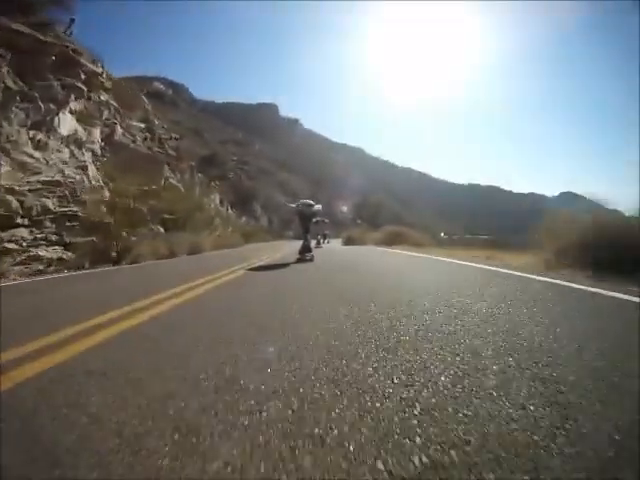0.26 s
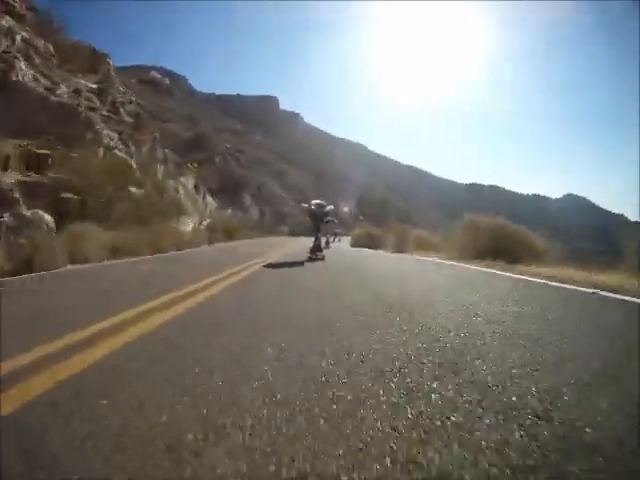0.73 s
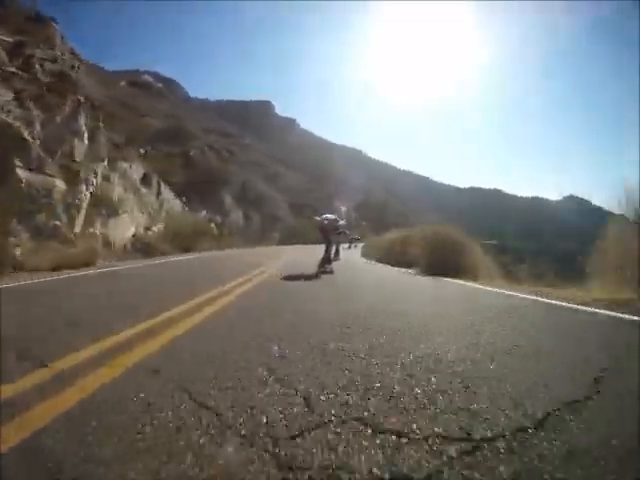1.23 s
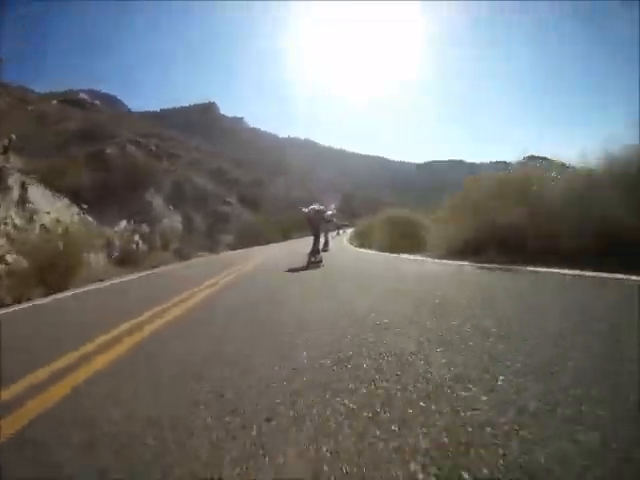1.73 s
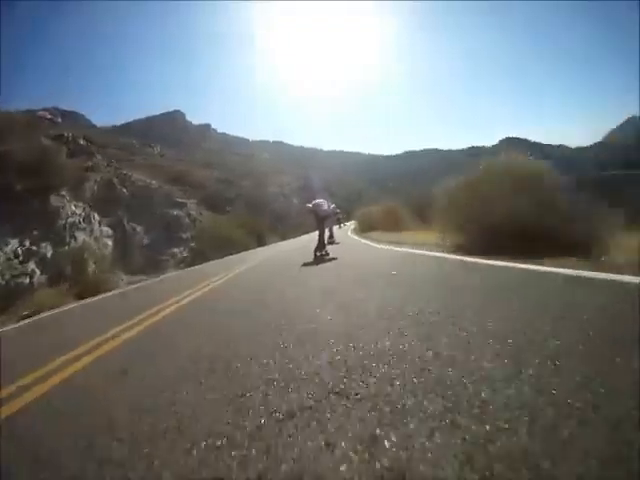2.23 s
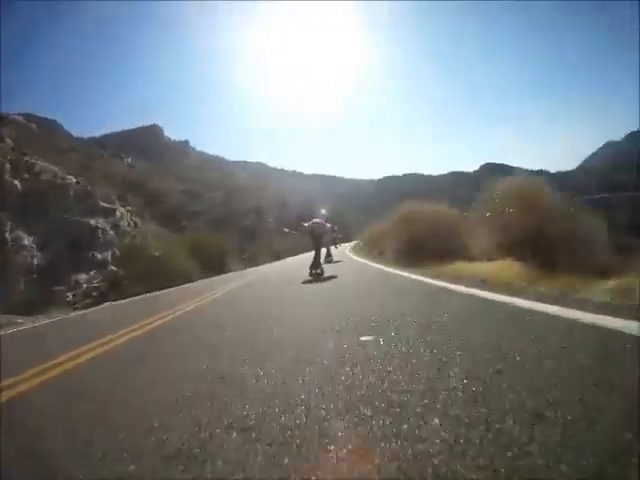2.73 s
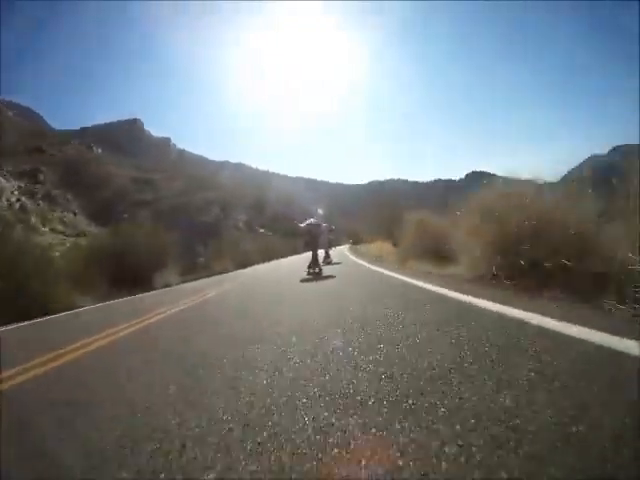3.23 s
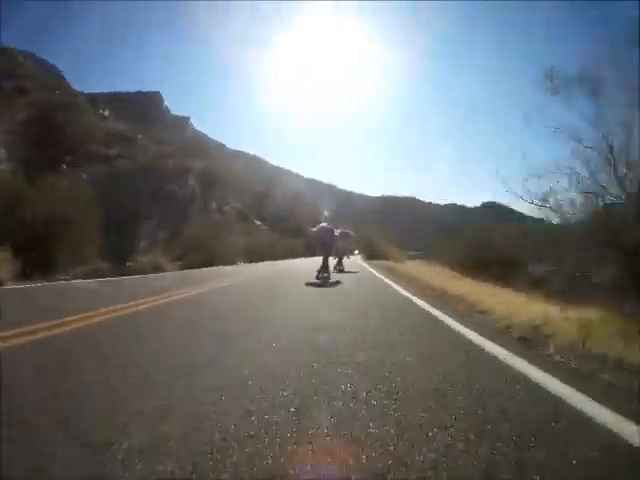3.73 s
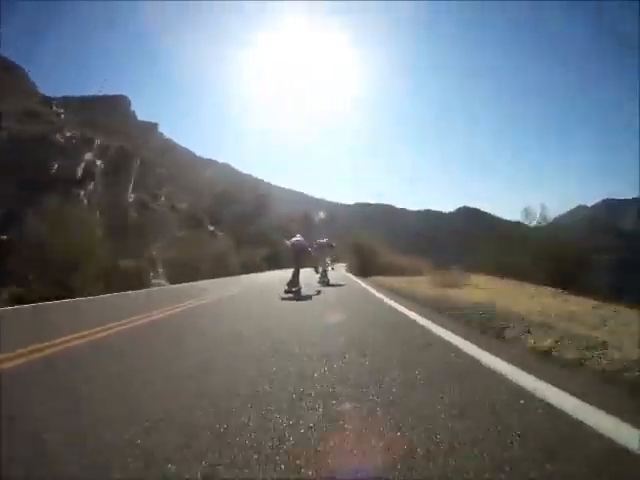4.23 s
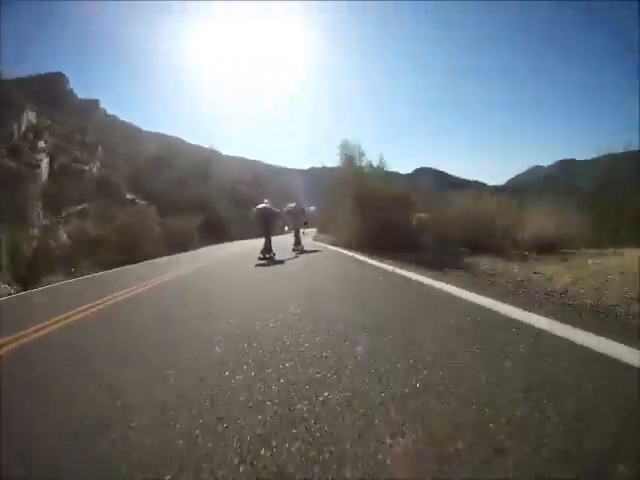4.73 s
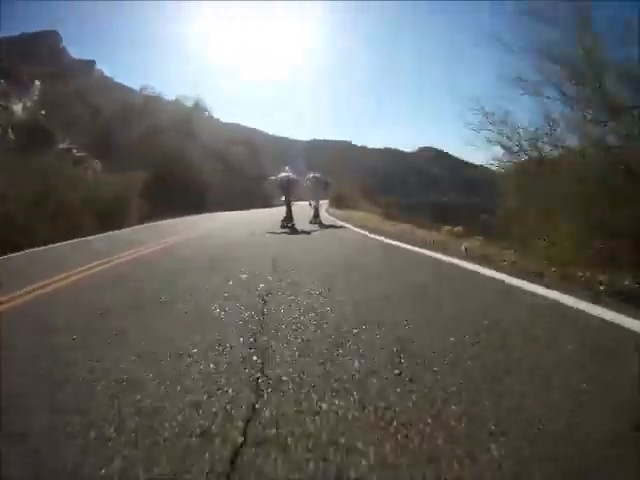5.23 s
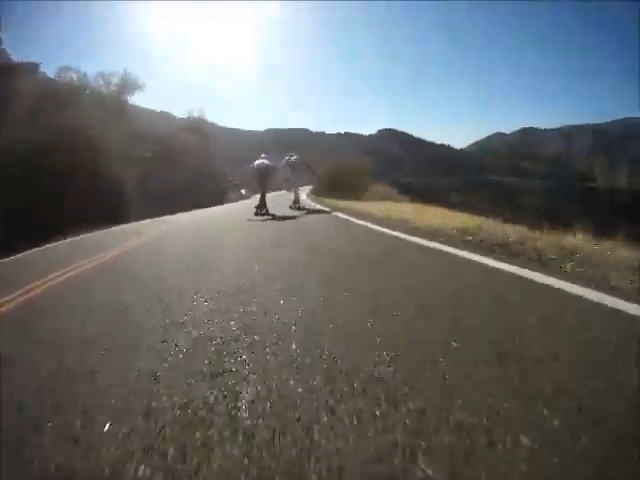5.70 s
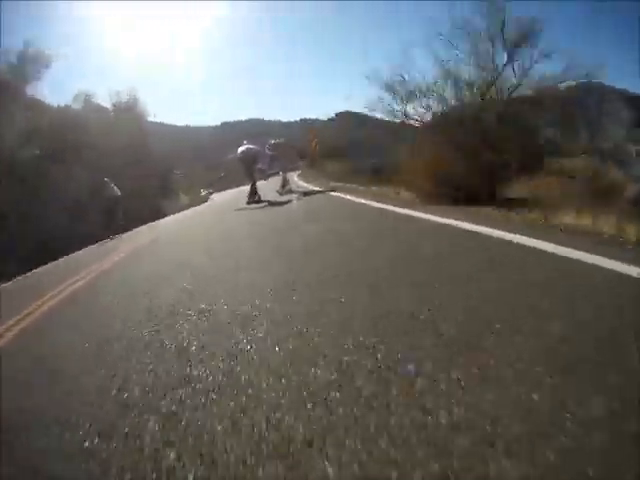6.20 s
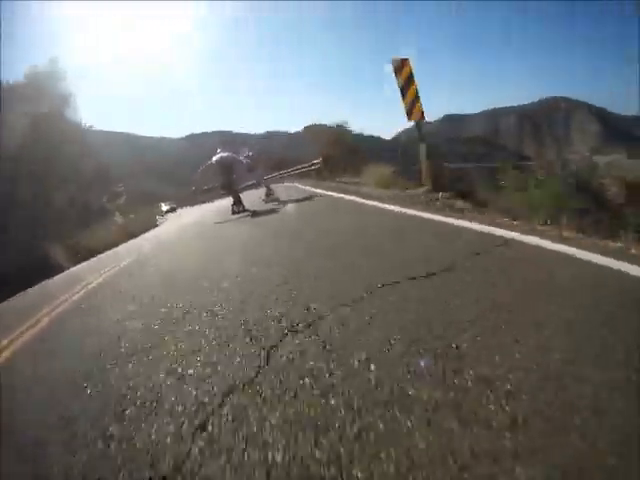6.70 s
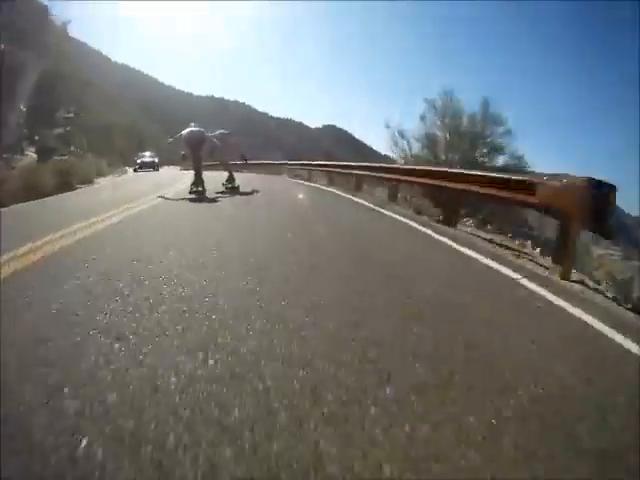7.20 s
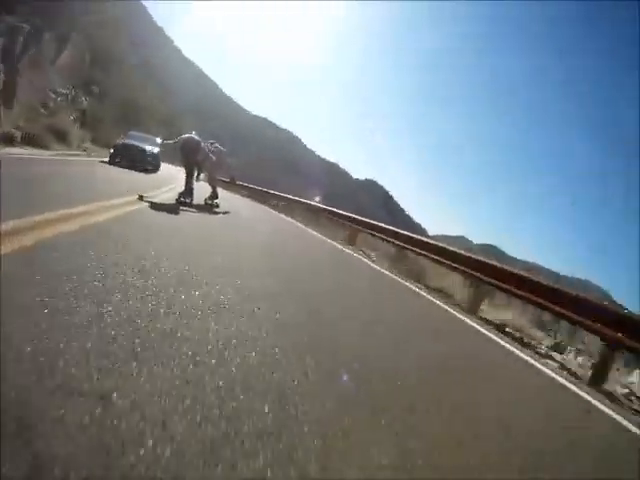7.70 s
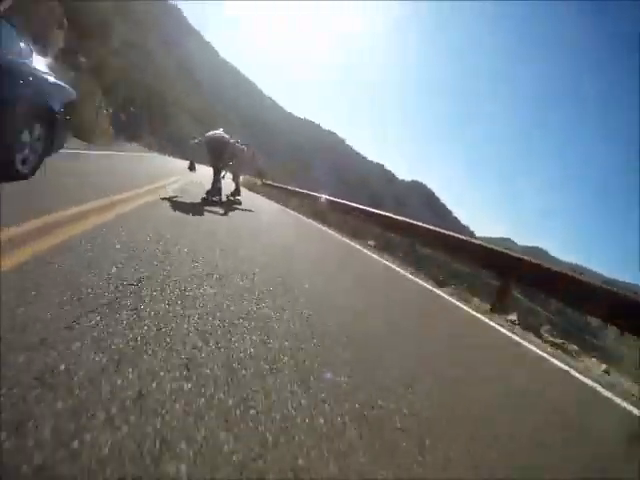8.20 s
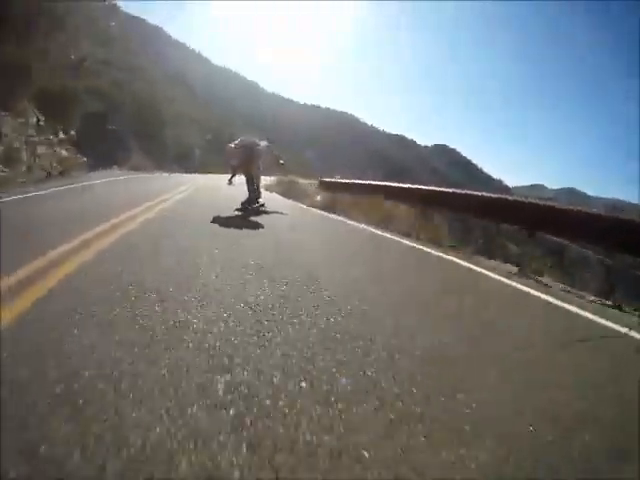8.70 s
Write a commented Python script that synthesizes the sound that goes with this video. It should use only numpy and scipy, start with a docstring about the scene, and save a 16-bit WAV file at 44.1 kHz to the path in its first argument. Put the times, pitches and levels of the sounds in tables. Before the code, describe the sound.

A longboard runs downhill on a paved mountain road, heard close from inside a sealed camera housing. From 0 s a very faint grainy wheel hiss rises steadily, reaching full level around 5.6 s. It is boxy and midrange, with dull lumpy wind, deep deck rumble and thin, coarse digital treble. A slight bump opens the sound, and brief gritty flickers pass. At 2.35-2.7 s a rapid group of low thuds shakes the deck; more come at 3.45-3.6 s, then a rougher shudder with scraping hiss at 4.1-4.35 s. Afterwards the rolling is steadier, its hollow resonance and fine sizzle varying with the surface, slightly softer around 7.2 s. At about 7.9 s a pebble gives a sharp, short crack on the housing. A rough patch follows at 8.2 s, with weak bumps and renewed low rumble around 8.5 s; rolling continues to the end, near 9 s.

```python
"""Longboard ride with a housed camera

A camera in a closed housing rides on a longboard down an asphalt road. Filtered noise makes the hiss of
wheels and housing, the dull wind and the deck's rumble; decaying sines make the deck's jolts and,
with cracks of noise, the pebbles that strike the housing. A limiter pulls loud moments down, and a
low-rate converter mirrors the sound into the treble while the level fades in."""
import sys
import numpy as np
from scipy import signal
from scipy.io import wavfile
from scipy.ndimage import uniform_filter1d, minimum_filter1d

SR = 44100
rng = np.random.default_rng(int(sys.argv[2]) if len(sys.argv) > 2 else 0)


def wav_record(signal):
    """Record a signal, one row per channel, as 16-bit PCM in the file named by sys.argv[1]."""
    frames = np.transpose(np.atleast_2d(signal))
    bounded = np.clip(frames, -1, 1)
    # unit amplitude maps onto the largest positive 16-bit level
    quanta = np.round(bounded * 32767).astype(np.int16)
    wavfile.write(sys.argv[1], SR, quanta)


def amplitude_ratio(level_db):
    """Convert a level in decibels to the matching linear amplitude (field) ratio."""
    exponent = np.asarray(level_db, float) / 20
    return 10 ** exponent


N = 394694
T = np.arange(N) / SR  # seconds


def evened(x):
    """Scales a sound to rms 1."""
    return x / np.sqrt(np.mean(x ** 2) + 1e-20)


def add(mix, start_s, sound):
    """Mixes a sound in at its start time."""
    part = mix[round(start_s * SR):][:len(sound)]
    part += sound[:len(part)]


def peaks(modes, hz, steep):
    """Magnitude of independently driven resonances: their powers add; steep sharpens each peak."""
    power = 0
    for mode_hz, width_hz, db in modes:
        offset = 2 * (hz - mode_hz) / width_hz
        power = power + amplitude_ratio(2 * db) / (1 + offset ** 2) ** steep
    return np.sqrt(power)


def noise(shape, size, patchy_db):
    """Noise from random short-time spectra of magnitude shape(hz), with drifting louder and softer patches."""
    hz = np.fft.rfftfreq(size, 1 / SR)
    frames = 4 * N // size + 5
    real, imaginary, patches = rng.standard_normal((frames, len(hz), 3)).T
    patches = uniform_filter1d(patches, size=9, axis=0)  # along frequency
    patches = evened(uniform_filter1d(patches, size=8, axis=1))  # along time
    spectra = (real + 1j * imaginary) * shape(hz)[:, None] * amplitude_ratio(patchy_db * patches)
    sound = signal.istft(spectra, nperseg=size, noverlap=3 * size // 4)[1]
    return evened(sound[:N])


def swells(rows):
    """Bell-shaped rises (or dips, if negative) in dB at the given places."""
    return sum(top_db * np.exp(-(2 * (T - middle_s) / length_s) ** 2) for middle_s, length_s, top_db in rows)


# The ride, point by point. Each row: time in seconds, coarseness of the asphalt in dB,
# lean into the bend from 0 to 1, fineness of the grit from 0 to 1.
RIDE = [(0, 2, 0.23, 0), (.8, -0.06, 0.1, 0.4), (1.45, 0, 0.27, 0), (1.75, .5, 0, 0.2),
        (2.05, 1.3, 0.1, 0.1), (2.25, -0.5, 0, 0), (2.56, 0.5, 0.6, 0.3), (2.75, -1, 0.15, 0),
        (2.95, 0.5, 0, 0.5), (3.4, 0, .2, 0.25), (3.85, 0.8, 0, .2), (4.05, 1, 0.77, 0.4),
        (4.5, -.5, 0, 0.3), (4.8, 0.1, 0.18, 0.77), (5.4, -0.55, 0.37, 0.56), (5.62, -0.1, 1, 0.4),
        (6.05, 0, 0.52, 0.7), (6.4, -0.9, 0.86, .8), (6.85, 0.4, 1, 0.2), (7.2, -2, 0.6, 0.5),
        (7.55, -1.2, .9, .95), (7.85, -1, 1, 0.66), (8.25, -0.36, 0.4, 0.77), (8.7, 0, 0.7, .6),
        (8.95, -2, 0.9, .5)]


def curve(law):
    """Gain of a layer along the ride, from the coarseness and fineness of the asphalt and the lean."""
    time_s, coarse_db, lean, fine = np.transpose(RIDE)
    plain_db, share, lean_db, fine_db = law
    level_db = plain_db + share * coarse_db + lean_db * lean + fine_db * fine
    return amplitude_ratio(np.interp(T, time_s, level_db))


# Patches of asphalt that raise or lower the hiss.
# Each row: middle in seconds, length in seconds, change of the grit in dB.
PATCHES = [(0.016, 0.02, 9), (1.496, 0.0082, 8.5), (3.762, 0.0086, -4), (3.928, .015, 3), (4.133, 0.1, 3.5),
           (4.16, 0.031, 7), (6.958, 0.0092, 6.5), (7.497, 0.015, 4), (8.212, 0.035, 3.5)]


def grit(slow_db=0.26, quick_db=0.79):
    """Unevenness of the asphalt in dB, felt by all resonances of wheels and housing at once."""
    slow, quick = rng.standard_normal((2, N))
    slow = uniform_filter1d(uniform_filter1d(slow, size=1500), size=1500)
    quick = uniform_filter1d(uniform_filter1d(quick, size=200), size=200)
    return slow_db * evened(slow) + quick_db * evened(quick) + swells(PATCHES)


# Resonances of wheels and housing, low to high; TOP_MODES are the highest ones of the housing.
# Each row: frequency in Hz, width in Hz before sharpening, relative level in dB.
LOWER_MODES = [(738, 43, -25), (1026, 142, -4.5), (1144, 130, -1.5), (1265, 146, 0.5)]
UPPER_MODES = [(1594, 590, -8), (2130, 130, 1), (2297, 180, -0.5), (2523, 620, -5.5), (3260, 396, -10),
               (3854, 670, -16)]
TOP_MODES = [(4830, 430, 1.5), (5480, 300, -5.5)]
# How each group follows the ride. The values: level in dB on plain road before the grit,
# share of the coarseness felt, dB gained at full lean, dB gained on the finest grit.
LOWER_LAW = (-44.5, 0.2, 6.5, -1.13)
UPPER_LAW = (-37.5, 1.63, 0.5, -0.02)
TOP_LAW = (-59.5, 0.1, 0.2, 7.5)


def wheels(grit_db, reach=0.38):
    """Rolling hiss through three groups of resonances; the grit reaches the higher two groups less."""
    lower = noise(lambda hz: peaks(LOWER_MODES, hz, steep=2.56), size=1024, patchy_db=0.82)
    upper = noise(lambda hz: peaks(UPPER_MODES, hz, steep=1.36), size=1024, patchy_db=0.92)
    top = noise(lambda hz: peaks(TOP_MODES, hz, steep=1.65), size=1024, patchy_db=1.24)
    higher = curve(UPPER_LAW) * upper + curve(TOP_LAW) * top
    return amplitude_ratio(grit_db) * curve(LOWER_LAW) * lower + amplitude_ratio(reach * grit_db) * higher


# Spectrum of wind and dull wheel noise between the resonances.
# Each row: frequency in Hz, relative level in dB.
WIND_SPECTRUM = [(15, -33), (60, 0.5), (120, -2.5), (220, -8), (450, -13), (650, -14), (900, -9),
                 (1500, -9), (2400, -8), (3600, -34), (6000, -35)]
# How it follows the ride. The values: level in dB on plain road before the grit,
# share of the coarseness felt, dB gained at full lean, dB gained on the finest grit.
WIND_LAW = (-47, 0.46, -1.5, -1)


def wind(grit_db, scrape=1.62):
    """Lumpy broadband air and tyre noise on the housing; of all layers it follows the grit most."""
    point_hz, point_db = np.transpose(WIND_SPECTRUM)

    def shape(hz):
        return amplitude_ratio(np.interp(np.log(hz + 1), np.log(point_hz), point_db))

    return amplitude_ratio(scrape * grit_db) * curve(WIND_LAW) * noise(shape, size=2048, patchy_db=1.5)


# Bending modes of the deck, used by the jolts too.
# Each row: frequency in Hz, width in Hz before sharpening, relative level in dB.
DECK_MODES = [(44.4, 23.6, -2), (78.8, 13.4, 0), (158.7, 108, -26.5)]
# How the rumble follows the ride. The values: level in dB on plain road before the bumps,
# share of the coarseness felt, dB gained at full lean, dB gained on the finest grit.
DECK_LAW = (-41, -0.4, 0.5, 1.2)
# Bumpy stretches that keep the deck shaking.
# Each row: middle in seconds, length in seconds, rise in dB.
BUMPY = [(0.02, .15, 8), (.32, 0.2, 4), (.66, .2, 1.5), (1.1, 0.12, 3.5), (1.75, .15, 4.5), (2.08, .15, 8),
         (2.48, 0.43, 8.5), (2.9, 0.11, 6), (3.45, 0.53, 5), (4.15, 0.53, 11), (4.8, 0.21, 2.5),
         (5.28, 0.23, 4.5), (5.8, .3, 2), (6.2, 0.35, 5.5), (6.9, 0.23, 5), (8.15, .2, 4.5),
         (8.56, 0.47, 9)]


def rumble(steadiness=0.04):
    """The deck modes driven at random, with their slow swings in loudness evened out a little."""
    shaking = noise(lambda hz: peaks(DECK_MODES, hz, steep=2.0), size=8192, patchy_db=1.5)
    loudness = np.sqrt(abs(uniform_filter1d(shaking ** 2, size=2400)) + 0.05)
    return curve(DECK_LAW) * amplitude_ratio(swells(BUMPY)) * evened(shaking / loudness ** steadiness)


# Jolts that shake the deck. Each row: start in seconds, relative level in dB,
# seconds before the swing dies away, share of the lower mode from 0 to 1.
JOLTS = [(0.013, -16.5, 0.04, 0.78), (1.528, -32, 0.08, 0.26), (1.999, -25, .045, 0.17),
         (2.353, -15, 0.021, 0.01), (2.391, -8, 0.025, 0.65), (2.426, -10, 0.024, 0.9),
         (2.477, -12.5, 0.012, 0.22), (2.509, -19, 0.025, 0.32), (2.672, -12.5, 0.0076, 0.04),
         (2.715, -15, 0.0098, 0), (3.435, -16, 0.027, 0), (3.448, -10.5, 0.021, 0.36),
         (3.495, -17, 0.055, 0), (3.587, -20, 0.016, 0.94), (4.109, -15, 0.024, 0.4),
         (4.141, -17, 0.02, 0.05), (4.178, -15.5, 0.064, 0.05), (4.279, -13.5, 0.017, 0.66),
         (4.307, -18.5, 0.028, 0.6), (4.341, -28, 0.013, 0.1), (8.22, -27, 0.044, 0.5),
         (8.345, -31, .02, 1), (8.465, -23, 0.011, 0.84), (8.793, -24, 0.02, 0.63)]


def jolts(rise_s=0.0092, damping=1.0, takeover_s=0.013, stiffen=0.83, full_db=10):
    """Each jolt swings the deck modes for its length; feet and wheels damp them, the next jolt takes over."""
    out = np.zeros(N)
    t = np.arange(SR // 2) / SR
    (low_hz, low_width, _), (high_hz, high_width, _), (knock_hz, knock_width, _) = DECK_MODES
    knock_decay = np.exp(-np.pi * knock_width * np.maximum(t - rise_s, 0))
    knock = knock_decay * np.sin(2 * np.pi * knock_hz * t)
    onset = np.sin(np.pi / 2 * np.minimum(t / rise_s, 1)) ** 2
    next_rows = JOLTS[1:] + [(np.inf,)]
    for (start_s, db, length_s, share), (next_s, *_) in zip(JOLTS, next_rows):
        after = np.pi * damping * np.maximum(t - length_s, 0)
        low = np.exp(-low_width * after) * np.sin(2 * np.pi * low_hz * t)
        high = np.exp(-high_width * after) * np.sin(2 * np.pi * high_hz * t)
        share = np.clip(share, 0, 1)
        past_next = np.maximum(t + start_s - next_s, 0)
        shape = onset * np.exp(-(past_next / takeover_s) ** 2)
        knock_db = stiffen * (db - full_db)  # hard blows wake the stiff mode more than in proportion
        swing = share * low + (1 - share) * high + amplitude_ratio(knock_db) * knock
        add(out, start_s, -amplitude_ratio(db) * shape * swing)  # the deck drops first
    return out


# Pebbles strike the housing; the loud one bounces. Each row: start in seconds, relative level in dB.
PEBBLES = [(1.008, -34), (7.9129, -13.2), (7.9152, -20.5)]
# What the housing rings with. Each row: frequency in Hz, relative level in dB,
# seconds to die away by 60 dB.
SHELL = [(1250, -1, 0.03), (2082, 3, 0.032), (2700, -10, 0.012), (3600, -3, 0.012), (4540, -3, 0.011),
         (5460, -4.5, 0.013)]


def pebbles(crack=0.7, crack_t60_s=0.014, contact_s=0.0006):
    """A broadband crack and a short ring of the housing shell at each contact."""
    out = np.zeros(N)
    t = np.arange(4000) / SR
    ring = sum(amplitude_ratio(db - 60 * t / t60_s) * np.sin(2 * np.pi * hz * t) for hz, db, t60_s in SHELL)
    ring = ring / abs(ring).max()
    band = signal.butter(2, [1300, 6800], "bandpass", fs=SR, output="sos")
    onset = 1 - np.exp(-t / contact_s)
    hisses = rng.standard_normal((len(PEBBLES), len(t)))
    for (start_s, db), hiss in zip(PEBBLES, hisses):
        snap = evened(signal.sosfilt(band, hiss)) * amplitude_ratio(-60 * t / crack_t60_s)
        add(out, start_s, amplitude_ratio(db) * onset * (ring + crack * snap))
    return out


def scene():
    """All that shakes the camera, with one grit shared by wheels and wind."""
    grit_db = grit()
    mix = wheels(grit_db) + wind(grit_db) + rumble() + jolts() + pebbles()
    return mix[None]


def limiter(x, knee_db=-13.0, depth=2.0, lag_s=0.0075, hold_s=0.076, smooth_s=0.0028):
    """Peaks over the knee pull the gain down a moment later; it holds, then springs back."""
    over_db = np.maximum(20 * np.log10(abs(x) + 1e-9) - knee_db, 0)
    width = int(hold_s * SR) // 2 * 2 + 1
    cut_db = minimum_filter1d(-depth * over_db, width, origin=width // 2)  # looks back only
    keep = np.exp(-1 / (smooth_s * SR))
    smooth_db = signal.lfilter([1 - keep], [1, -keep], cut_db)
    late_db = np.interp(T - lag_s, T, smooth_db)
    return x * amplitude_ratio(late_db)


def converter(x):
    """Samples at 12 kHz and holds each value for four steps, which leaves mirror images around 12 kHz."""
    slow = signal.resample_poly(x, 40, 147)
    held = signal.resample_poly(np.repeat(slow, 4), 147, 160)[:N]
    return np.pad(held, (0, N - len(held)))


# The level fades in. Each row: time in seconds, gain as a plain factor.
FADE = [(0, 0.13), (5.6, 0.94)]


def fade_in(x):
    """Raises the gain in a straight line, then holds it."""
    return x * np.interp(T, *np.transpose(FADE))


def roll_off(x):
    """The treble ends steeply here."""
    return signal.sosfilt(signal.butter(12, 15720, fs=SR, output="sos"), x)


def record(dry):
    """Microphone bass cut, limiter, low-rate converter, fade-in and a steep treble edge."""
    bass_cut = signal.butter(2, 21, "highpass", fs=SR, output="sos")
    mic = signal.sosfiltfilt(bass_cut, dry[0])
    faded = fade_in(converter(limiter(mic)))
    treble_edge = signal.firwin(1001, 15270, window=("kaiser", 9), fs=SR)
    finished = signal.oaconvolve(faded, treble_edge, "same")
    return roll_off(finished[None])


dry = scene()
out = record(dry)
wav_record(out)
```